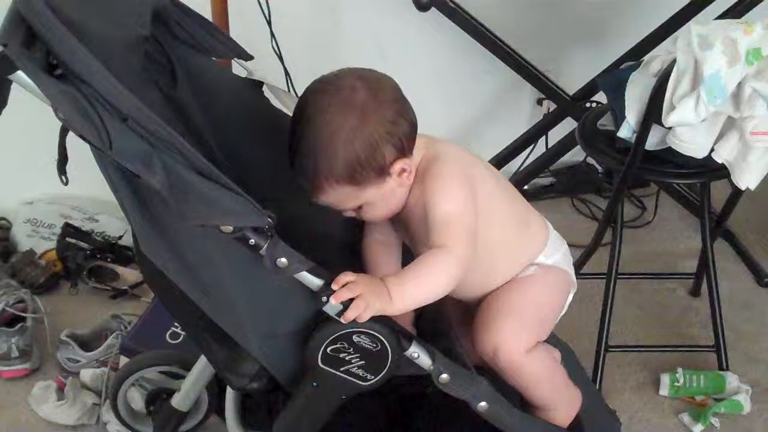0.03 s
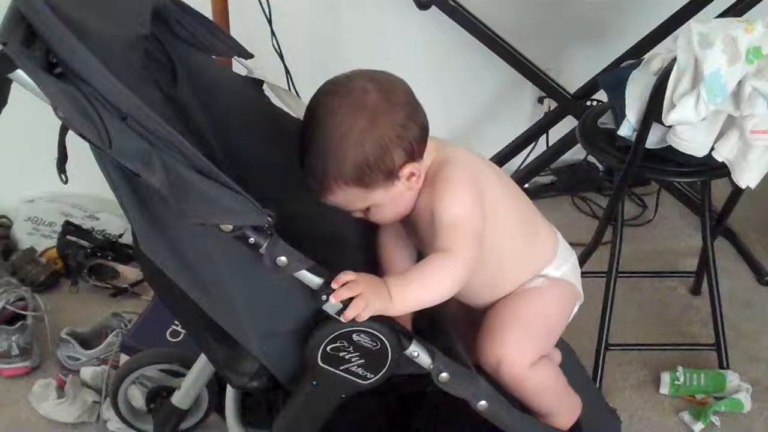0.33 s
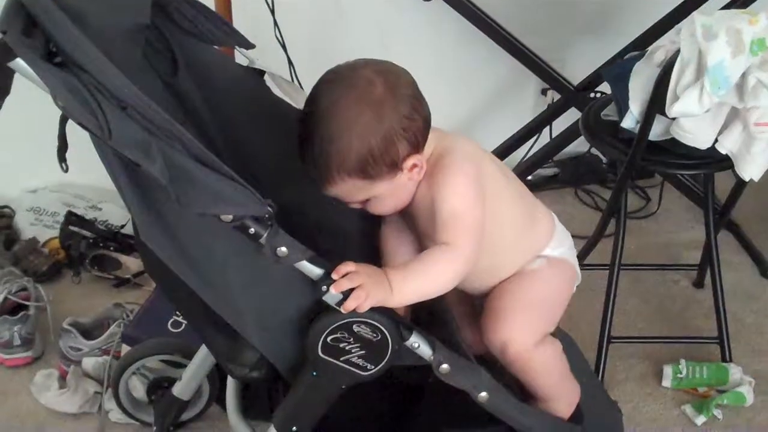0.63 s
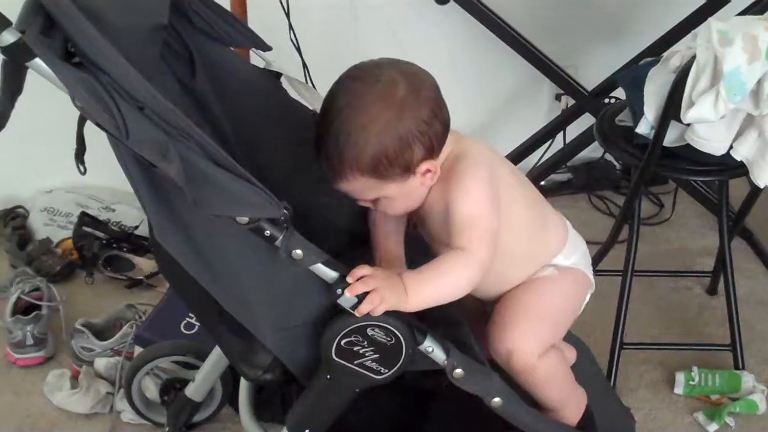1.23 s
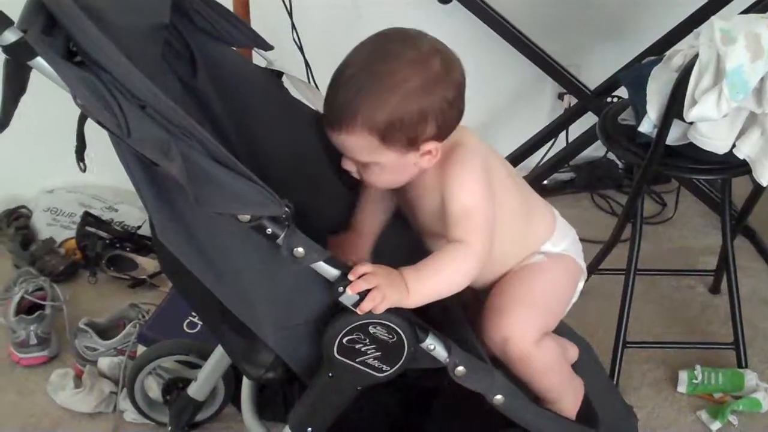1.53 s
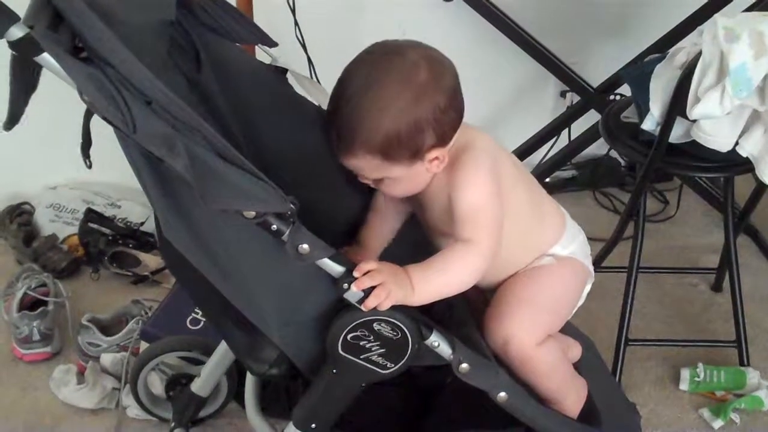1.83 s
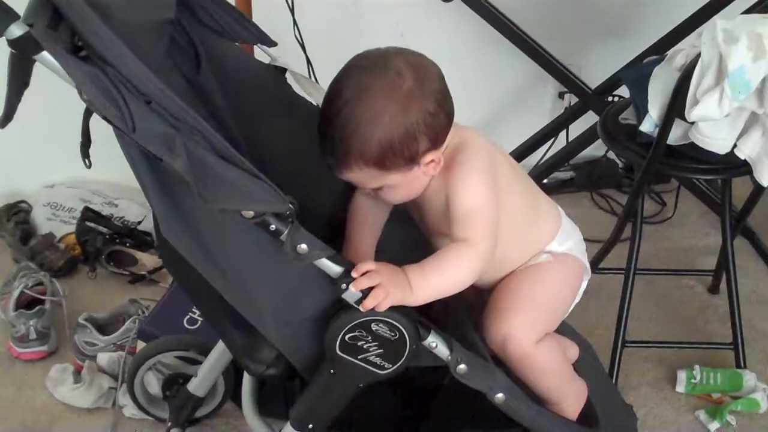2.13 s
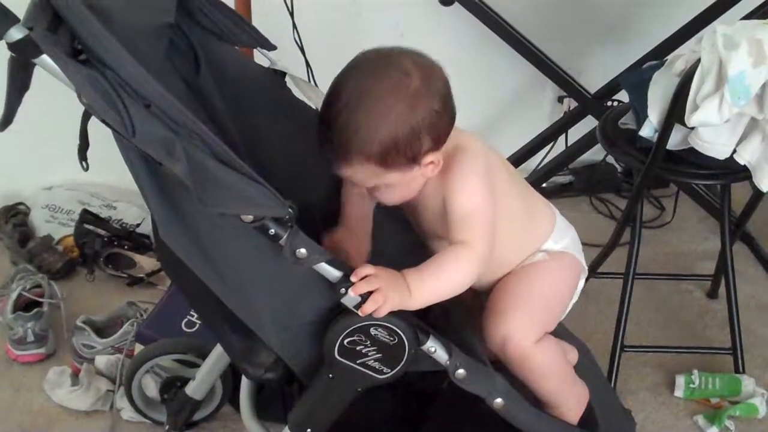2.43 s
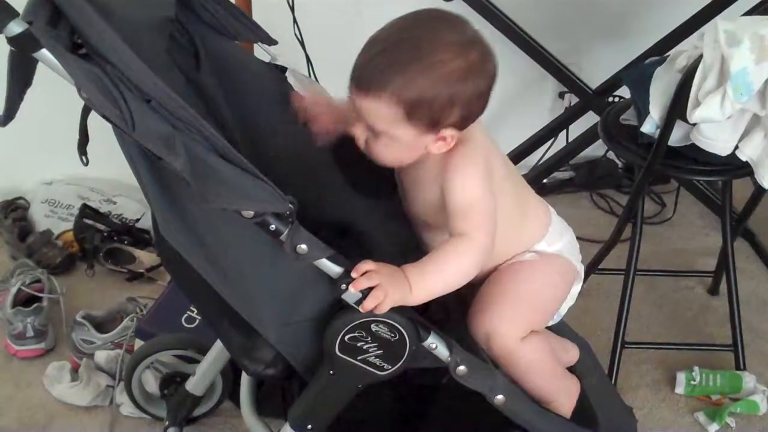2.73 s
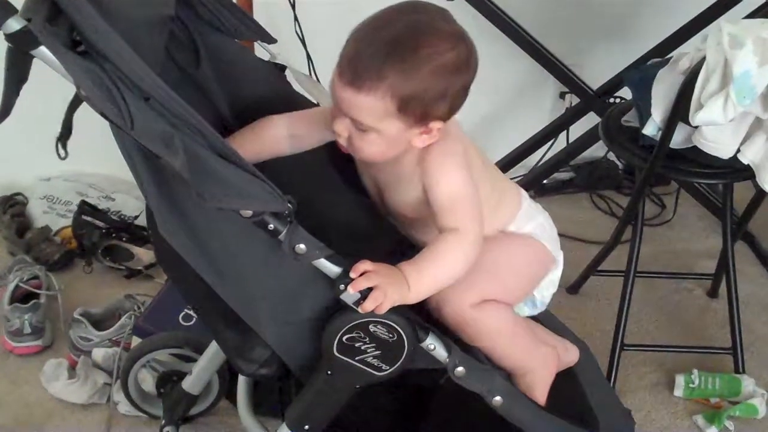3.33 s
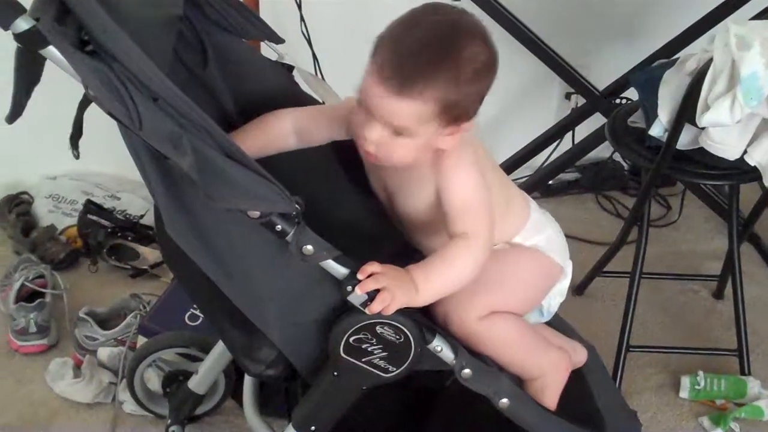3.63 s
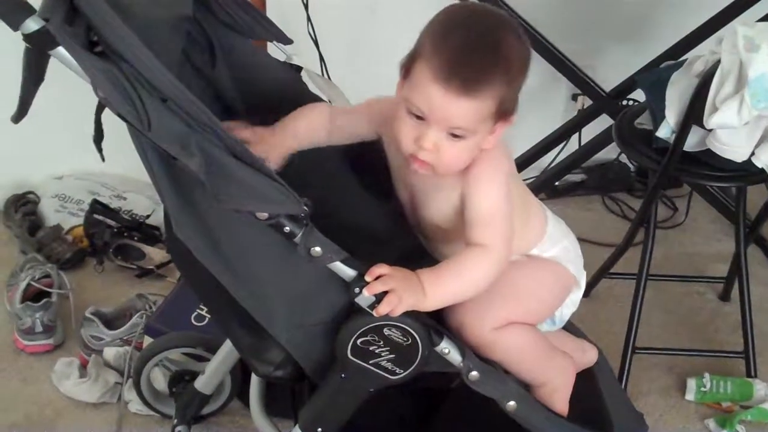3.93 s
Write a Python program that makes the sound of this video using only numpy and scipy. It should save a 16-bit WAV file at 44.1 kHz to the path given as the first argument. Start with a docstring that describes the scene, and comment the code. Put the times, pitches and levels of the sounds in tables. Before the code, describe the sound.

Fabric brushing, plastic knocks and jingling buckles on a stroller, over a steady fan.

```python
"""A fan blows steadily in a room while a small child climbs about on a stroller.
Hands and knees brush the seat fabric; at about one second the plastic frame creaks and knocks under
the shifting weight and a strap slips. The harness buckles jingle and the seat gives with a soft thump.
After a lull a small ring clinks, fingers tap the hood, and more brushes follow.
One close microphone; both channels are the same."""
import sys
import numpy as np
from scipy import signal
from scipy.fft import rfft, irfft
from scipy.io import wavfile

SR = 44100
rng = np.random.default_rng(int(sys.argv[2]) if len(sys.argv) > 2 else 0)


def unload_audio(sound):
    """Save the sound as a 16-bit wav file, at the path given as the first command line argument."""
    columns = np.transpose(np.atleast_2d(sound))
    # keep every value between -1 and 1, then stretch to whole-number steps
    steps = np.round(np.clip(columns, -1, 1) * 32767)
    wavfile.write(sys.argv[1], SR, steps.astype(np.int16))


N = 176400


def amp(db):
    """Decibels to gain."""
    return 10 ** (np.asarray(db) / 20)


def unit(x):
    """Scales to rms 1."""
    return x / np.sqrt(np.mean(x ** 2) + 1e-20)


def unit_energy(x):
    """Scales an impulse response to energy 1."""
    return x / np.linalg.norm(x)


def curve(points, hz):
    """Reads a table on a log-frequency axis."""
    freqs, values = np.transpose(points)
    return np.interp(np.log(hz + 1), np.log(freqs + 1), values)


def add(mix, start_s, sound):
    """Mixes a sound in at its start time."""
    part = mix[max(round(start_s * SR), 0):][:len(sound)]
    part += sound[:len(part)]


def noise(gains):
    """White noise shaped by one gain per frequency bin."""
    return irfft(rfft(rng.standard_normal(N)) * gains, N)


def response(colour, tilt_db=0, size=4096):
    """Minimum-phase impulse response of a tone colour, tilted per octave above 3 kHz."""
    hz = abs(np.fft.fftfreq(size, 1 / SR))
    log_gain = np.log(amp(curve(colour, hz) + tilt_db * np.log2(np.maximum(hz, 3000))))
    spectrum = np.exp(np.conj(signal.hilbert(log_gain)))
    return unit_energy(np.fft.ifft(spectrum).real)


def ringing(modes, tilt_db=0, detune=.003):
    """Dying sines of struck metal, each slightly detuned at random."""
    t = np.arange(SR // 5) / SR
    out = np.zeros(len(t))
    for hz, db, t60 in modes:
        gain = amp(db + tilt_db * np.log2(hz / modes[0][0]))
        pitch_hz = hz * (1 + detune * rng.standard_normal())
        out += gain * np.exp(-np.log(1000) * t / t60) * np.sin(2 * np.pi * (pitch_hz * t + rng.random()))
    return unit_energy(out)


def stroke(db, rise_s, fade_s, per_s, spread_db=0):
    """Friction grain: a run of tiny random slips that swells and dies away."""
    t = np.arange(SR) / SR
    slips = (rng.random(SR) < per_s / SR) * rng.choice([-1, 1], SR)
    sizes = amp(spread_db * np.minimum(rng.exponential(1, SR), 4))
    envelope = np.minimum(t / rise_s, 1) * np.exp(-np.maximum(t - rise_s, 0) / fade_s)
    return amp(db) * unit(slips * sizes) * envelope


def rub(body, db, rise_s, fade_s, spread_db=0):
    """A dense stroke of slipping fibres, heard through a body's impulse response."""
    return signal.fftconvolve(stroke(db, rise_s, fade_s, per_s=6000, spread_db=spread_db), body)


# Broad wash of moving air: freq_hz, density_db
FAN_AIR = [(20, -5), (55, -20), (100, -12.5), (135, -13.5), (160, -6), (225, -3.5), (320, -3.5), (440, -4),
           (610, -3), (800, -1), (1050, -2.5), (1400, -6), (2100, -4), (2450, -8.5), (3100, -7.5),
           (4000, -9.5), (5000, -13), (6300, -17), (7500, -14.5), (9200, -23), (11500, -28.5),
           (14000, -37.5)]
# Narrow resonances that the air keeps humming: pitch_hz, width_hz, level_db
FAN_HUMS = [(219.6, 8.6, -70), (236.5, 6.6, -68.5), (258.7, 11.7, -65), (360.6, 6.5, -70), (432, 18, -65),
            (464.2, 22, -63), (477.2, 23, -59), (554, 12, -67), (786.6, 12, -66), (863, 15, -67),
            (887, 17, -63), (1033, 12, -65.5), (1659, 23, -66)]


def fan(air_db=-49, flutter_db=.5):
    """The bed: an even rush of air with a slight flutter, and narrow bands of hum."""
    hz = np.fft.rfftfreq(N, 1 / SR)
    air = unit(noise(amp(curve(FAN_AIR, hz))))
    flutter = unit(noise(hz < 25))
    hum_power = np.zeros(len(hz))
    for pitch, width, db in FAN_HUMS:
        peak_power = amp(db) ** 2 * SR / (np.pi * width / 2)
        hum_power += peak_power / (1 + (2 * (hz - pitch) / width) ** 2) ** 2
    return amp(air_db + flutter_db * flutter) * air + noise(np.sqrt(hum_power))


# Decay of the room: freq_hz, t60_s
ROOM_DECAY = [(200, 0.19), (2000, 0.31), (7000, 0.254), (14000, 0.286)]


def room(x, reflections_per_s=4000, predelay_s=.004):
    """A short tail of sparse reflections; the bass dies first."""
    reflections = rng.standard_normal(SR) * (rng.random(SR) < reflections_per_s / SR)
    reflections *= np.arange(SR) / SR > predelay_s
    hz, t, bands = signal.stft(reflections, SR, nperseg=256)
    decay = np.exp(-np.log(1000) * t / curve(ROOM_DECAY, hz)[:, None])
    tail = signal.istft(bands * decay, SR)[1]
    return signal.fftconvolve(x, unit_energy(tail))[:N]


# Dull body of the seat: freq_hz, density_db
SEAT_COLOUR = [(15, -7), (40, -17), (100, -15), (165, 5), (400, -34), (2000, -73)]
# Weight landing on it: start_s, level_db, rise_s, fade_s
SEAT_THUMPS = [(1.552, -56, .012, .025)]


def seat_thump():
    """The seat gives under the child's weight with a soft, low thump."""
    out = np.zeros(N)
    for start, db, rise, fade in SEAT_THUMPS:
        add(out, start, rub(response(SEAT_COLOUR), db, rise, fade))
    return out


def seat_sag(start_s=1.570, peak_db=-54, rise_s=.002, rebound_s=.11):
    """The sinking seat draws air: a quick drop in pressure and a slow rebound."""
    t = np.maximum(np.arange(N) / SR - start_s, 0)
    rebound = (1 - t / rebound_s) * np.exp(-t / rebound_s)
    return -amp(peak_db) * np.minimum(t / rise_s, 1) * rebound


# Swish of the woven seat cover: freq_hz, density_db
FABRIC_COLOUR = [(300, -12), (1500, 0.5), (2700, -3), (3700, 2), (5000, -3.5), (5800, -1.5), (6700, -3),
                 (8500, -1), (9500, -6.5), (10900, -5), (14000, -12.5)]
# Passes of hands and knees: start_s, level_db, rise_s, fade_s, tilt_db_per_octave
FABRIC_BRUSHES = [(.14, -56.5, 0.063, 0.105, -2), (.316, -63, .003, 0.0097, 5.5),
                  (.352, -47.5, 0.0039, 0.0118, 12), (0.977, -60, 0.0071, 0.067, 6),
                  (1.09, -56, 0.025, 0.082, -1), (2.79, -62, 0.016, 0.048, -2),
                  (2.945, -49, 0.0011, 0.0082, -2), (2.975, -51, .015, 0.017, -3),
                  (2.996, -52, 0.0052, 0.027, 10), (3.12, -55.5, 0.026, 0.11, -1),
                  (3.156, -58, .001, .004, 5), (3.22, -65, 0.039, 0.23, 8), (3.81, -56, 0.029, 0.14, -0.5)]


def fabric():
    """Skin brushes the weave, and the fibres slip in grains of uneven size."""
    out = np.zeros(N)
    for start, db, rise, fade, tilt in FABRIC_BRUSHES:
        add(out, start, rub(response(FABRIC_COLOUR, tilt), db, rise, fade, spread_db=2.5))
    return out


# Thin, bright tone of the strap's slider: freq_hz, density_db
SLIDER_COLOUR = [(2000, -23), (5400, -14), (6000, 3), (6500, -4), (7200, 0), (7800, -4), (8700, 3.5),
                 (9900, -9), (10600, 2), (11600, -11), (14000, -24)]
# Slip of the strap: start_s, level_db, rise_s, fade_s
STRAP_SLIPS = [(1.032, -46.3, .002, .010)]


def strap():
    """A strap slips through its slider with a short zip."""
    out = np.zeros(N)
    for start, db, rise, fade in STRAP_SLIPS:
        add(out, start, rub(response(SLIDER_COLOUR), db, rise, fade))
    return out


# Crisp tone of the taut hood: freq_hz, density_db
HOOD_COLOUR = [(600, -5), (2600, -12), (3550, 3), (4400, -4), (5170, 2), (5800, -11), (6450, 1), (7600, -6),
               (8500, 3), (9500, -10), (10700, 2), (12200, -3), (13100, -13), (14000, -8)]
# Finger taps: start_s, level_db
HOOD_TAPS = [(2.996, -42.5), (3.003, -43.5), (3.009, -43)]


def hood():
    """Fingers land on the taut hood in a tight cluster of ticks."""
    out = np.zeros(N)
    for start, db in HOOD_TAPS:
        add(out, start, rub(response(HOOD_COLOUR), db, rise_s=.0012, fade_s=.0037))
    return out


# Clacky body of the plastic frame: freq_hz, density_db
FRAME_COLOUR = [(100, -51), (500, -1.5), (750, -6), (950, 3), (1450, -1.5), (2200, -7), (3300, -16),
                (4400, -9), (5200, -18), (7000, -16), (7850, -10), (8800, -17), (10000, -18), (10800, -16),
                (14000, -24.5)]
# Knocks of its joints: start_s, peak_db
FRAME_KNOCKS = [(0.998, -38), (1.015, -37), (1.045, -50), (1.081, -31), (1.082, -35), (1.087, -31.5),
                (1.102, -31), (1.116, -45.5), (1.137, -42), (1.150, -39), (1.156, -37)]
# Creaks under load: start_s, level_db, rise_s, fade_s
FRAME_CREAKS = [(0.971, -51.5, 0.071, 0.061), (1.085, -49.5, 0.0114, 0.17)]


def frame(buzz_db=-15.5, buzz_fade_s=.0048):
    """Plastic joints slip: sharp knocks with a short buzz, over a fine creak."""
    drive, body = np.zeros(N), response(FRAME_COLOUR)
    t = np.arange(SR // 10) / SR
    click = t == 0
    for start, db in FRAME_KNOCKS:
        buzz = amp(buzz_db) * rng.standard_normal(len(t)) * np.exp(-t / buzz_fade_s)
        add(drive, start, amp(db) * (click + buzz) / abs(body).max())
    for start, db, rise, fade in FRAME_CREAKS:
        add(drive, start, stroke(db, rise, fade, per_s=830, spread_db=-1.0))
    return signal.fftconvolve(drive, body)[:N]


# Partials of a small metal ring: pitch_hz, level_db, t60_s
RING_MODES = [(5250, -16, .018), (5590, -7.5, .014), (6000, -9, 0.0103), (6440, -5, 0.016),
              (8850, -9, 0.0077), (10620, 0.5, 0.013), (11250, -17, .007), (12200, -23, .007)]
# Its grazing clinks: start_s, level_db
RING_CLINKS = [(1.203, -59), (1.262, -57), (2.556, -43), (2.563, -40), (2.569, -47.5)]


def small_ring():
    """A small metal ring grazes the frame in very short clinks."""
    drive, body = np.zeros(N), ringing(RING_MODES)
    for start, db in RING_CLINKS:
        add(drive, start, stroke(db, rise_s=.0016, fade_s=.0021, per_s=4500))
    return signal.fftconvolve(drive, body)[:N]


# Partials of the metal buckle: pitch_hz, level_db, t60_s
BUCKLE_MODES = [(6520, 0, .035), (6640, -6, .035), (8600, -11, .015), (10550, -9, .03), (10720, -4, .035),
                (11310, 0, .03), (11720, -6, .02), (12700, -13, .05)]
# Partials of the clasp that hits it: pitch_hz, level_db, t60_s
CLASP_MODES = [(5125, -11, .045), (6415, -4, .04), (7765, -1, .04), (7870, -2, .03), (8020, -8, .03),
               (9700, -11, .045), (11850, -5, .025)]
# Sizzle of metal scraping on metal: freq_hz, density_db
SCRAPE_COLOUR = [(300, -32.5), (2000, -3.5), (4000, -6), (6000, 1.5), (8200, 3), (9800, 0), (11500, 2),
                 (12600, -2), (14000, -6.5)]
# Jingles: start_s, level_db, rise_s, fade_s, tilt_db_per_octave, buckle_db, clasp_db
HARNESS_SHAKES = [(1.332, -42.5, 0.00196, 0.011, 8, -8, -4.5), (1.377, -46.5, 0.0018, 0.01, 1, 2, -14),
                  (1.386, -44, 0.0034, 0.013, -4, -6, -16.5), (1.425, -43, 0.0031, 0.0099, -10, -12, -14),
                  (1.446, -43, 0.0028, 0.011, -2, -0.5, -12), (1.453, -39.5, 0.0038, 0.021, 2.5, -1, -11),
                  (1.512, -51.5, 0.0049, 0.026, 0, -9, -4), (1.540, -47.5, 0.0037, .02, 0, 1, -5.5),
                  (1.555, -41.5, 0.0054, 0.035, 1, -2.5, -4), (1.565, -40, 0.015, 0.011, -4, 0, -2.5),
                  (1.600, -44, 0.0038, 0.05, 4, -20, -10), (1.628, -48.5, 0.00215, 0.011, -2, 5.5, -11.5),
                  (1.662, -49.5, .005, 0.0127, 8, -8.5, -6.5)]


def buckles(scrape_db=-2.5):
    """Each shake of the harness is a quick chatter of contacts that scrape and ring buckle and clasp."""
    out = np.zeros(N)
    for start, db, rise, fade, tilt, buckle_db, clasp_db in HARNESS_SHAKES:
        body = amp(buckle_db) * ringing(BUCKLE_MODES, tilt)
        body += amp(clasp_db) * ringing(CLASP_MODES, tilt)
        add(body, 0, amp(scrape_db) * response(SCRAPE_COLOUR, tilt))
        chatter = stroke(db, rise, fade, per_s=4500)
        add(out, start, signal.fftconvolve(chatter, body))
    return out


def scene(room_db=-5):
    """The stroller and its room reflections over the fan."""
    stroller = buckles() + small_ring() + frame() + fabric() + strap() + hood() + seat_thump()
    mono = stroller + amp(room_db) * room(stroller) + seat_sag() + fan()
    return np.array([mono, mono])


def record(dry, open_s=.053, pop_s=.018, pop_db=-41, cutoff_hz=14000):
    """The microphone opens with a faint low pop; a steep low-pass trims the top."""
    t = np.arange(N) / SR - open_s
    fade_in = np.clip(t / .0013 + 1, 0, 1)
    pop = amp(pop_db) * (t < pop_s)
    lowpass = signal.firwin(511, cutoff_hz, window=("kaiser", 9), fs=SR)
    return signal.oaconvolve(fade_in * (dry + pop), lowpass[None], "same")


dry = scene()
out = record(dry)
unload_audio(out)
```